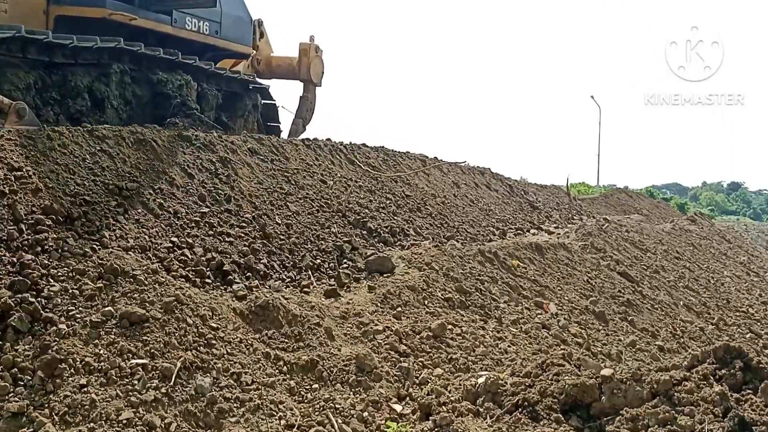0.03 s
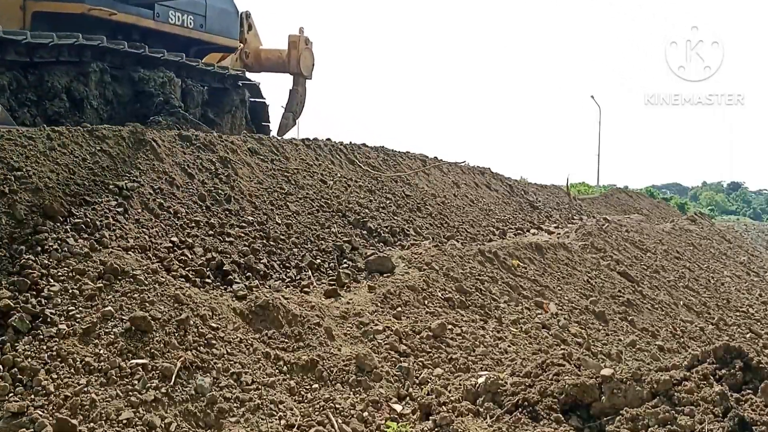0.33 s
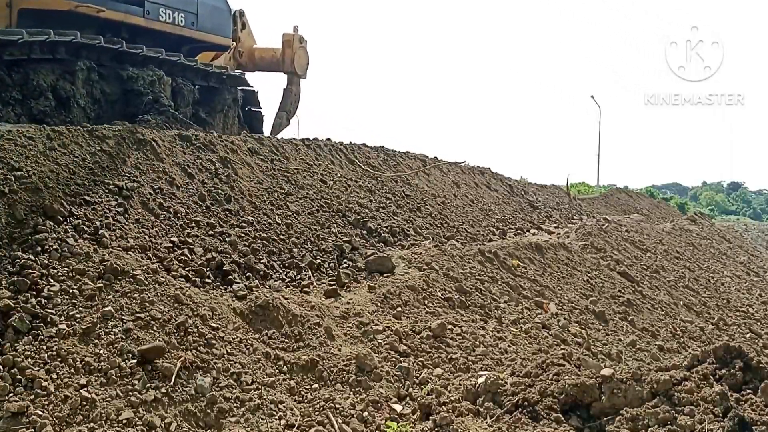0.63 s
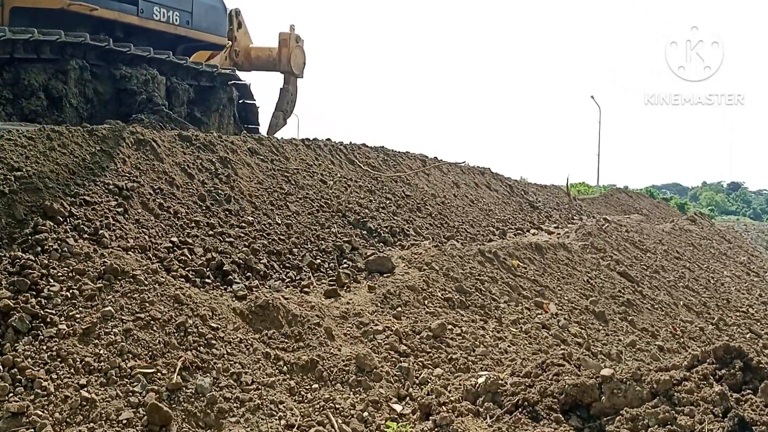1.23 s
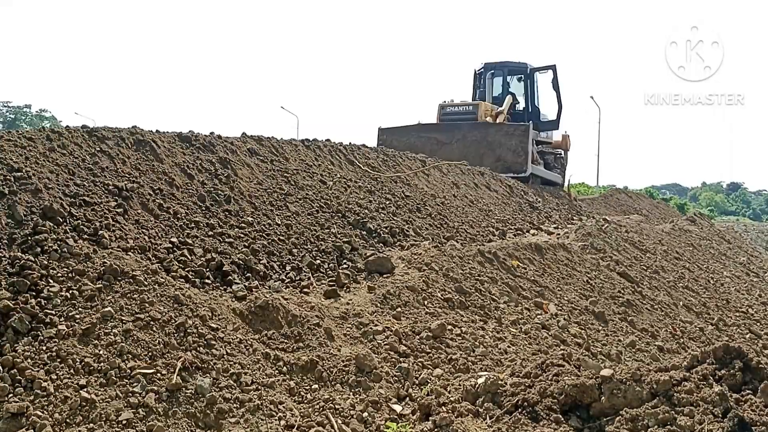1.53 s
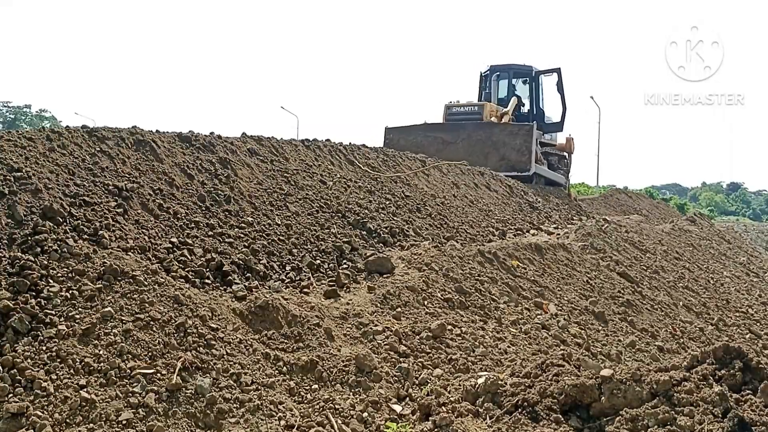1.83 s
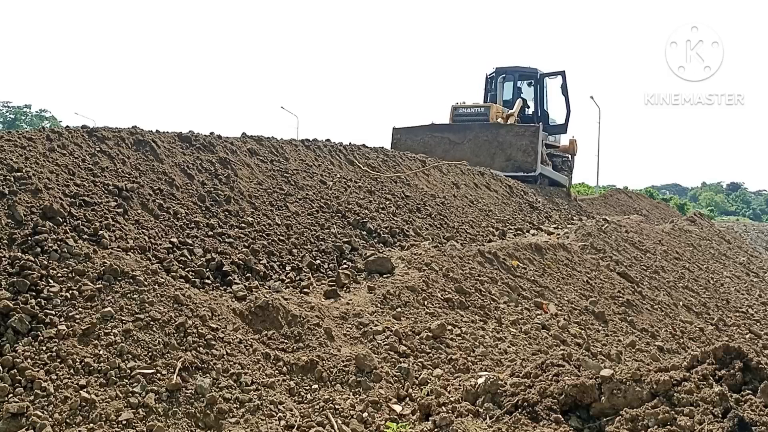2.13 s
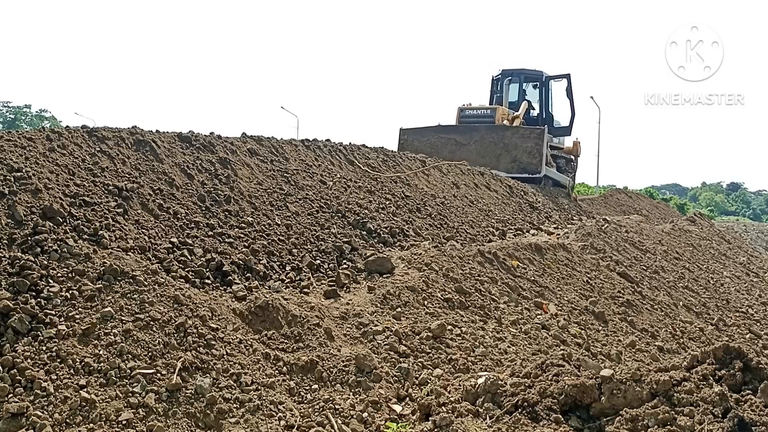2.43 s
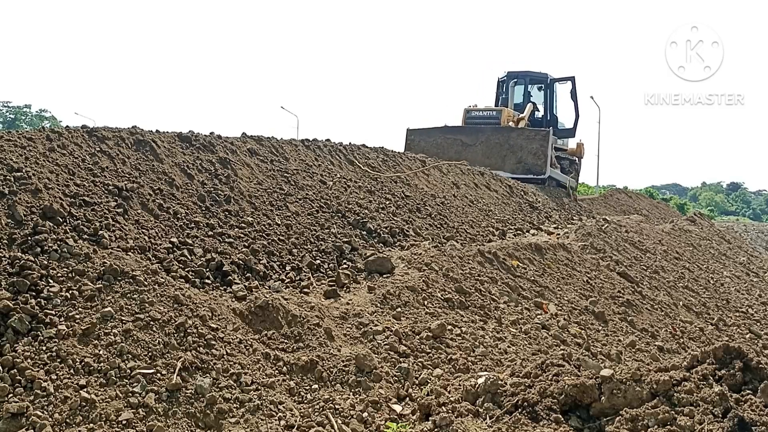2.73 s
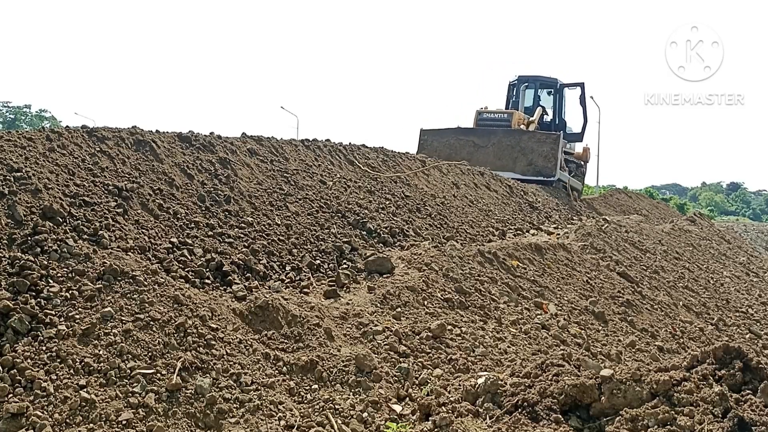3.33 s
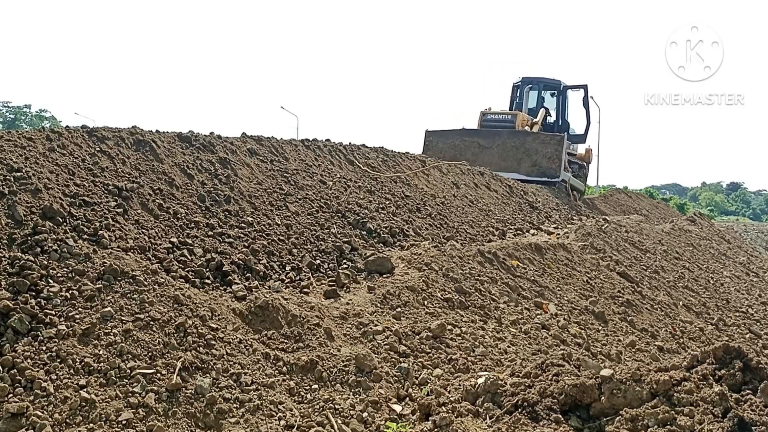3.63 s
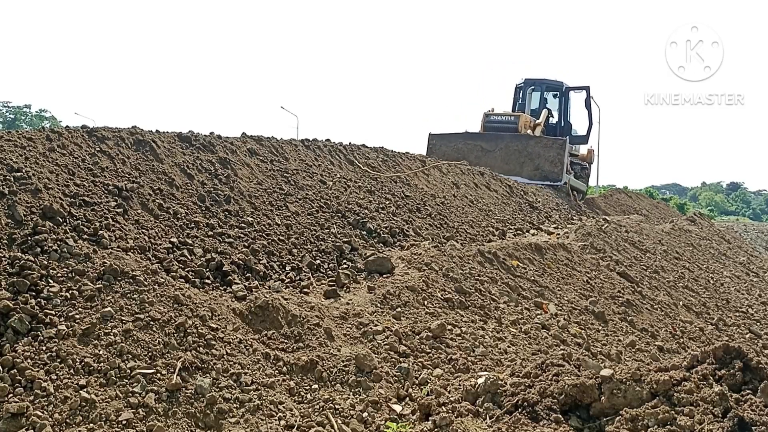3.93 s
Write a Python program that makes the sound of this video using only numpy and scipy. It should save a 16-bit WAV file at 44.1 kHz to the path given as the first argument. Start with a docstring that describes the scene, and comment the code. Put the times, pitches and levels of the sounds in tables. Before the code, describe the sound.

A bulldozer rumbles near the microphone outdoors, its engine winding down as the tracks crackle, squeal and clank once. The sound shifts to a quieter, duller, more distant engine with a light hiss, which then eases off and burbles.

```python
"""Close by, a six-cylinder diesel bulldozer winds down to idle: firings drone in the exhaust, the engine
clatters, gears whine, grit crackles in the tracks, rollers squeal and steel clanks once. Around 1.7 s a quick
crossfade finds it working farther off, with intake hiss and a faint narrow band of high hiss. Near 2.9 s the
throttle closes, the high hiss band sinks and the exhaust drops to an uneven burble."""
import sys
import numpy as np
from scipy import signal
from scipy.fft import rfft, irfft
from scipy.io import wavfile
from scipy.ndimage import map_coordinates

SR = 44100
rng = np.random.default_rng(int(sys.argv[2]) if len(sys.argv) > 2 else 0)


def persist_wave(psi):
    """Save psi, clipped to +-1, as 16-bit WAV."""
    counts = np.round(np.clip(psi, -1, 1) * 32767).astype(np.int16)
    wavfile.write(sys.argv[1], SR, np.atleast_2d(counts).T)


N = 176400
T = np.arange(N) / SR
FREQS = np.fft.rfftfreq(N, 1 / SR)
CROSSFADE_AT_S, CROSSFADE_S = 1.686, 0.15
FIRINGS_PER_TURN = 3

# crank speed of the close machine: time_s, turns_per_s
NEAR_CRANK = [(0, 23.7), (.17, 22.1), (.5, 17.9), (.75, 15.4), (.95, 13.7), (1.3, 13.15)]
# bright tone of cracking stone: freq_hz, gain_db
STONE_EQ = [(1000, -52), (3000, 7), (7000, 4), (9300, -10), (12000, 30), (15500, 14.5)]


def near_dozer():
    """The close machine, a little to the left, slows to idle: exhaust, clatter and tracks."""
    # exhaust tones: crank_multiple, high_revs_db, low_revs_db
    orders = [(3, -33.5, -45), (5.25, -27.5, -42), (6, -44.5, -31), (9, -55, -33), (12, -36, -39)]
    # ring of the exhaust pipe: freq_hz, gain_db
    pipe_eq = [(20, -14), (45, -9), (75, 1), (130, 4.5), (190, -0.5), (260, 0), (340, -8.5), (500, -32)]
    # exhaust fader: time_s, gain_db
    exhaust_fader = [(0, 1.5), (.35, 2), (.65, 0), (1.7, -2.5)]
    # resonances of block and steelwork: freq_hz, gain_db
    body_eq = [(160, -3.5), (290, -16.5), (348, 1), (392, -6), (449, -0.5), (490, -1.5), (530, 0),
               (652, -1), (772, -7), (1100, -3), (1420, -9), (1700, -7), (3120, -14.5), (3300, -13),
               (3500, -17), (4400, -20), (5900, -16.5), (7480, -21.5), (9010, -39), (11800, -27.5),
               (15500, -28.5)]
    # clatter faders: time_s, mid_db, treble_db
    clatter_faders = [(0, -25, -32), (.35, -26.5, -31), (.7, -27.5, -32.5), (1.15, -27, -33.5),
                      (1.66, -30.5, -37)]
    turns = crank(NEAR_CRANK)
    speed = curve(NEAR_CRANK)
    revs = (speed - speed.min()) / np.ptp(speed)
    pipe = exhaust(turns, revs, orders, pipe_eq, burble_db=-34) * undb(curve(exhaust_fader))
    rattle = stereo(lambda: clatter(turns, knock=0.3, flicker_db=1.4), lead_ms=0.25, scatter_db=-.5)
    tracks = stereo(lambda: grit() + stone_snaps() + clank(), lead_ms=0.19, scatter_db=12)
    engine = steelwork(rattle, body_eq, low_cut_hz=245, shimmer_db=1.6)
    return pipe + ride_bands(engine, clatter_faders) + tracks


def far_dozer():
    """The distant machine works under load, then coasts off the throttle with its steelwork rattling."""
    # crank speed: time_s, turns_per_s
    speed = [(2.76, 22.7), (2.95, 24.3), (3.25, 22.2), (3.55, 21), (4, 19.8)]
    # exhaust tones: crank_multiple, fuel_on_db, fuel_off_db
    orders = [(3, -41.5, -51), (5, -42, -37), (6, -38, -45), (7, -39, -48.5), (9, -48, -73), (10, -48, -63)]
    # ring of the exhaust pipe: freq_hz, gain_db
    pipe_eq = [(20, -38), (45, -14.5), (80, -3.5), (140, 5.5), (190, 3), (260, -13.5), (330, -17.5),
               (450, -33.5)]
    # exhaust fader: time_s, gain_db
    exhaust_fader = [(2.77, 2.5), (2.84, -4), (2.92, -2.5), (3.04, -5.5), (3.15, -3), (3.21, -7.5),
                     (3.48, -9), (3.54, -21), (3.79, -18), (3.94, -4)]
    # steelwork resonances under load and coasting: freq_hz, gain_db
    loaded_eq = [(190, -13), (265, 0.5), (360, -13), (427, -16), (518, -2.5), (881, 0), (1400, -5),
                 (1750, -6), (2280, -16.5), (2510, -10), (2900, -26.5), (3200, -19.5), (3600, -21),
                 (7630, -36), (8960, -48), (12200, -44.5), (15500, -47)]
    coasting_eq = [(190, -21), (440, -17), (580, -5), (738, -1.5), (1090, 4.5), (1400, -6), (1700, -3),
                   (2030, -8.5), (2250, -13), (2900, -27), (3250, -19), (3500, -23), (4700, -19.5),
                   (15500, -82)]
    # clatter faders: time_s, mid_db, treble_db
    clatter_faders = [(1.799, -36, -40), (2.7, -39, -41.5), (2.9, -40, -44), (3.02, -45.5, -48),
                      (3.35, -45.5, -50.5), (3.75, -46, -50), (4.0, -43.5, -51.5)]
    lead_ms = -0.059  # reaches the right side first
    turns = crank(speed)
    load = 1 - ramp(middle_s=2.856, length_s=0.31)
    fuel = 1 - ramp(middle_s=2.94, length_s=0.069)
    pipe = exhaust(turns, fuel, orders, pipe_eq, burble_db=-38.5) * undb(curve(exhaust_fader))
    rattle = stereo(lambda: clatter(turns, knock=0.18, flicker_db=1), lead_ms, scatter_db=-1.5)
    loaded = steelwork(rattle, loaded_eq, low_cut_hz=247, shimmer_db=2.4)
    coasting = steelwork(rattle, coasting_eq, low_cut_hz=240, shimmer_db=3.6)
    engine = ride_bands(load * loaded + (1 - load) * coasting, clatter_faders)
    return pipe + engine + stereo(hiss_band, lead_ms, scatter_db=-1)


def crank(speed, flutter=.004):
    """Running count of crankshaft turns, with a slight flutter in speed."""
    return np.cumsum(curve(speed) * (1 + flutter * wander(12.1))) / SR


def exhaust(turns, drive, orders, pipe_eq, burble_db, throb_db=2.2):
    """Throbbing tones locked to the crank, over a burble of uneven firings that ring the pipe."""
    drone = 0
    for multiple, high_db, low_db in orders:
        level_db = low_db + (high_db - low_db) * drive + throb_db * wander(18)
        drone += np.sqrt(2) * undb(level_db) * np.sin(2 * np.pi * (multiple * turns + rng.random()))
    firings = np.flatnonzero(np.diff(np.floor(FIRINGS_PER_TURN * turns)))

    def gas():
        pulses = np.zeros(N)
        pulses[firings] = rng.uniform(-0.85, 1, N)[:len(firings)]
        return unit(pulses) + 0.72 * rng.standard_normal(N)

    muffler_db = 10 * np.log10(1 + (FREQS / 700) ** 4)
    burble = colour(stereo(gas, lead_ms=0, scatter_db=-1.5), response(pipe_eq) - muffler_db)
    return drone + undb(burble_db) * unit(burble)


def clatter(turns, knock, flicker_db):
    """Valve and gear chatter that loops every two turns, plus rough noise; both surge at each firing."""
    cycle = rng.standard_normal(4096)
    chatter = map_coordinates(cycle, [turns / 2 % 1 * len(cycle)], order=1, mode="grid-wrap")
    chatter = irfft(rfft(chatter) / (1 + (FREQS / 3500) ** 2), N)
    surge = 1 + knock * np.exp(-4 * (FIRINGS_PER_TURN * turns % 1))
    return unit((rng.standard_normal(N) + chatter) * surge) * undb(flicker_db * wander(25))


def steelwork(rattle, body_eq, low_cut_hz, shimmer_db, width_hz=55, swells_per_s=6):
    """The rattle rings block and panels; narrow midrange resonances come and go, each on its own."""
    low_cut_db = 10 * np.log10(1 + (low_cut_hz / (FREQS + 10)) ** 8)
    ringing = unit(colour(rattle, response(body_eq) - low_cut_db))
    hz, time_s, bands = signal.stft(ringing, SR, nperseg=2048)
    chance = rng.standard_normal((len(hz), len(time_s)))
    grid = np.meshgrid(hz / width_hz, time_s * swells_per_s, indexing="ij")
    swell = map_coordinates(chance, grid, mode="mirror")
    depth_db = shimmer_db / (1 + (hz[:, None] / 4000) ** 2)
    return unit(signal.istft(bands * undb(depth_db * swell), SR)[1][:, :N])


def running_gear():
    """Gear teeth sing at multiples of the crank speed; rollers squeal at their own pitch, and one brief knock
    rings."""
    # gear whines: start_s, length_s, crank_multiple, level_db
    gears = [(-.1, .75, 126, -38.5), (.03, .29, 42, -35.5), (.17, .34, 84, -38), (.84, .45, 42, -36),
             (.88, .4, 126, -42), (.98, .55, 84, -41)]
    # roller squeals, and a brief knock at 3.21 s: start_s, length_s, pitch_hz, level_db
    rollers = [(1.0, .72, 650, -36.5), (1.12, .4, 3290, -41), (1.62, 1.4, 863, -47),
               (1.70, 1.4, 906, -45.5), (3.21, .09, 897, -42.5), (3.56, .16, 592, -47)]
    speed = curve(NEAR_CRANK)
    teeth = sum(whine(start_s, length_s, multiple * speed, db) for start_s, length_s, multiple, db in gears)
    return teeth + sum(whine(*squeal) for squeal in rollers)


def whine(start_s, length_s, pitch_hz, level_db, jitter=.008, roughness=.5):
    """One rough, wavering tone that swells and fades; close up it reaches the left side first."""
    progress = np.clip((T - start_s) / length_s, 0, 1)
    swell = np.sqrt(2 * np.abs(np.sin(np.pi * progress)))
    phase = 2 * np.pi * np.cumsum(pitch_hz * (1 + jitter * wander(55.7))) / SR
    tone = undb(level_db) * swell * (1 + roughness * wander(35)) * np.sin(phase)
    lag_s = 95e-6 * (1 - ramp(CROSSFADE_AT_S, CROSSFADE_S))
    return np.array([tone, np.interp(T - lag_s, T, tone)])


def clank(ring_db=5, crack_db=2):
    """Track steel grinds against steel: a noisy crack and a short ring."""
    # a hard blow and a faint one right behind it: start_s, level_db
    hits = [(1.267, -25.5), (1.288, -42)]
    # modes of the steel: pitch_hz, level_db, t60_s
    modes = [(1504, -4, 0.11), (1578, 10, 0.082), (1945, -4.5, 0.23), (3300, -9, 0.065), (4820, -15, 0.19)]
    # tone of the crack: freq_hz, gain_db
    crack_eq = [(800, -13), (1600, 1.5), (5000, -2), (7500, -8), (9300, -24), (12000, -11), (15500, -24)]

    def blows(decay_s):
        return sum(undb(db) * strike(start_s, decay_s) for start_s, db in hits)

    ring = sum(undb(db - 60 * T / t60_s) * np.sin(2 * np.pi * hz * T) for hz, db, t60_s in modes)
    contact = blows(decay_s=0.018) * rng.standard_normal(N)
    ringing = signal.fftconvolve(contact, ring / np.linalg.norm(ring))[:N]
    return undb(ring_db) * ringing + undb(crack_db) * blows(decay_s=0.028) * shaped_noise(crack_eq)


def grit(grains_per_s=230, spread_db=8.5, level_db=-47.5):
    """Soil and small stones crackle in the tracks: many faint grains, a few loud ones."""
    timing, size = rng.random((N, 2)).T
    clicks = (timing < grains_per_s / SR) * undb(-spread_db * np.log(size + 0.024))
    grain = rng.standard_normal(N // 500) * np.exp(-T[:N // 500] / 0.0017)
    crackle = signal.fftconvolve(clicks, grain)[:N]
    return undb(level_db) * unit(colour(crackle, response(STONE_EQ)))


def stone_snaps(level_db=-34):
    """Single stones crack under the track shoes."""
    # when each stone breaks: start_s
    starts = [.645, 1.16, 1.521, 1.671]
    bursts = sum(strike(start_s, decay_s=.0025) for start_s in starts)
    return undb(level_db) * bursts * shaped_noise(STONE_EQ)


def thuds():
    """Short dull booms of the machine: rough low tones under a bell-shaped swell."""
    # booms: peak_s, half_width_s, pitch_hz, level_db
    booms = [(0.454, 0.034, 120, -29), (0.82, 0.032, 136.7, -29), (3.262, 0.012, 110, -41),
             (3.502, 0.024, 300, -46)]
    mix = 0
    for peak_s, half_width_s, pitch_hz, level_db in booms:
        tone = unit((1.1 + wander(63)) * np.sin(2 * np.pi * pitch_hz * T))
        mix += undb(level_db) * tone * np.exp(-.5 * ((T - peak_s) / half_width_s) ** 2)
    return mix


def hiss_band(band_db=-68, width_hz=230):
    """A narrow band of high hiss that sinks as the engine slows, over the broad hiss of the air intake."""
    # glide of the hiss band: time_s, pitch_hz
    glide = [(2.7, 10280), (3.25, 8950), (3.7, 8150), (4, 7950)]
    # tone of the intake hiss: freq_hz, gain_db
    intake_eq = [(2800, -12), (3250, -3), (3500, -10), (4400, -8.5), (4750, 0.5), (5000, 0.5), (5500, 1),
                 (6100, -6), (7100, -2.5), (9000, -27), (15500, -35)]
    # intake fader: time_s, level_db
    intake_fader = [(2.7, -49), (3.25, -47.5), (3.65, -52), (3.9, -57.5)]
    whistle = wander(width_hz) * np.sin(2 * np.pi * np.cumsum(curve(glide)) / SR)
    return undb(band_db) * unit(whistle) + undb(curve(intake_fader)) * shaped_noise(intake_eq)


def ride_bands(x, faders, crossover_hz=1677):
    """Split into mids and treble, and ride each on its own fader."""
    mids = irfft(rfft(x) / (1 + (FREQS / crossover_hz) ** 8), N)
    return sum(band / np.std(band.mean(0)) * undb(curve(faders, column))
               for column, band in enumerate((mids, x - mids), start=1))


def stereo(source, lead_ms, scatter_db):
    """Direct sound reaches the left side lead_ms early; each side gets its own scattered sound."""
    # share of scattered sound: freq_hz, share_db
    scatter = [(100, -8), (300, -7.5), (1500, -5), (5000, -1)]
    share = np.clip(undb(response(scatter) + scatter_db), 0, 1)
    direct = rfft(source()) * np.sqrt(1 - share ** 2)
    delay = np.exp(-2j * np.pi * FREQS * lead_ms / 1000)
    left = direct + share * rfft(source())
    right = direct * delay + share * rfft(source())
    return irfft(np.array([left, right]), N)


def undb(db):
    """Decibels to gain."""
    return 10 ** (np.asarray(db) / 20)


def unit(x):
    """Scale to rms 1."""
    return x / np.sqrt(np.mean(x ** 2) + 1e-18)


def curve(rows, column=1):
    """One column of a table as straight-line automation."""
    rows = np.array(rows)
    return np.interp(T, rows[:, 0], rows[:, column])


def response(eq):
    """Decibels of an EQ table at every frequency."""
    eq = np.array(eq)
    return np.interp(np.log(FREQS + 1), np.log(eq[:, 0]), eq[:, 1])


def colour(x, gain_db):
    """Minimum-phase EQ: resonances ring after the hit, never before."""
    cepstrum = irfft(np.log(undb(gain_db)), N)
    cepstrum[1:N // 2] *= 2
    cepstrum[N // 2 + 1:] = 0
    return irfft(rfft(x) * np.exp(rfft(cepstrum)), N)


def shaped_noise(eq):
    """Noise through an EQ table, rms 1."""
    return unit(colour(rng.standard_normal(N), response(eq)))


def wander(rate_hz):
    """Smooth random drift up to about the given rate, rms 1."""
    return unit(irfft(rfft(rng.standard_normal(N)) * np.exp(-(FREQS / rate_hz) ** 2), N))


def strike(start_s, decay_s):
    """Instant attack, exponential decay."""
    return (T >= start_s) * np.exp(-np.abs(T - start_s) / decay_s)


def ramp(middle_s, length_s):
    """Rise from 0 to 1."""
    return np.clip((T - middle_s) / length_s + .5, 0, 1)


def scene():
    """The close machine crossfades into the far one; the balance drifts from left to right."""
    far = ramp(CROSSFADE_AT_S, CROSSFADE_S)
    dozer = np.sqrt(1 - far) * near_dozer() + np.sqrt(far) * far_dozer()
    left_over_right_db = .5 * (1 - far) - far
    pan = undb(np.array([[.5], [-.5]]) * left_over_right_db)
    return (dozer + running_gear() + thuds()) * pan


def record(dry):
    """The right microphone is duller, and the top end is cut steeply."""
    # tilt between the microphones: freq_hz, left_over_right_db
    tilt = [(100, -0.5), (400, 0.3), (2400, 1.1), (8000, 1.5), (12000, 10.5)]
    balance = undb(np.array([[.5], [-.5]]) * response(tilt))
    balance /= np.sqrt(np.mean(balance ** 2, axis=0))
    high_cut = signal.ellip(10, .2, 80, 15700, fs=SR, output="sos")
    return signal.sosfilt(high_cut, irfft(rfft(dry) * balance, N))


dry = scene()
out = record(dry)
persist_wave(out)
```